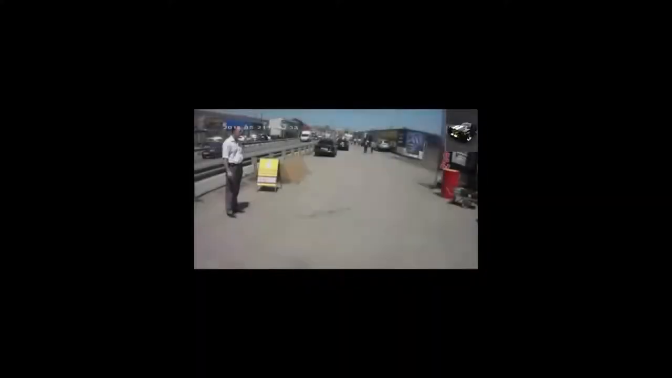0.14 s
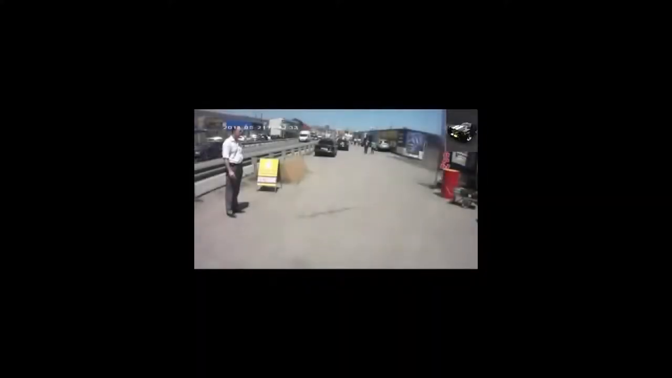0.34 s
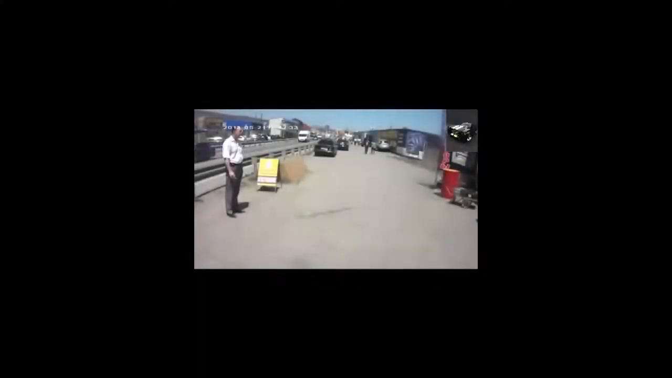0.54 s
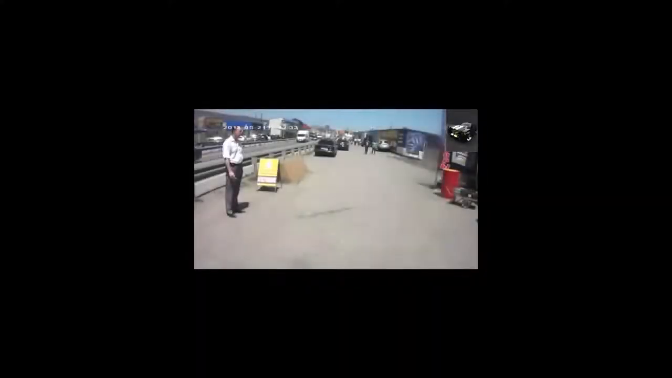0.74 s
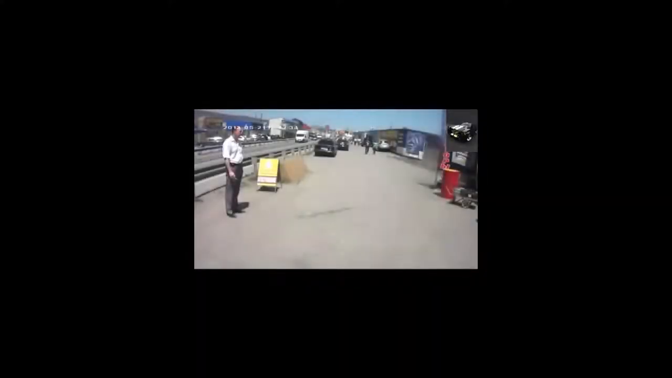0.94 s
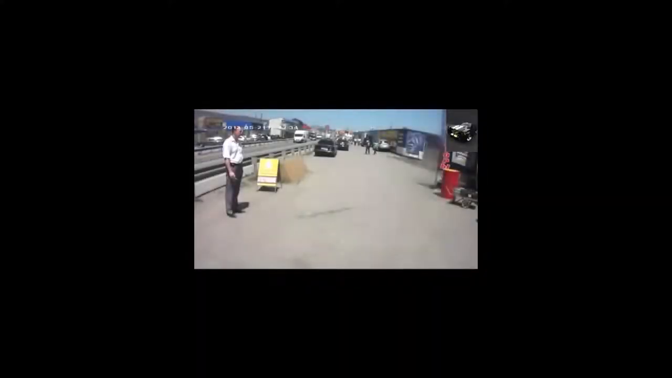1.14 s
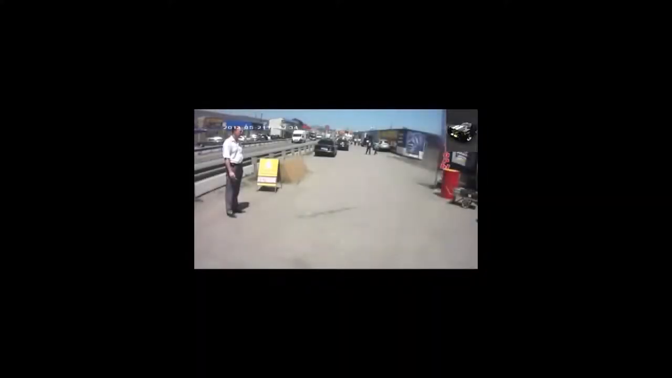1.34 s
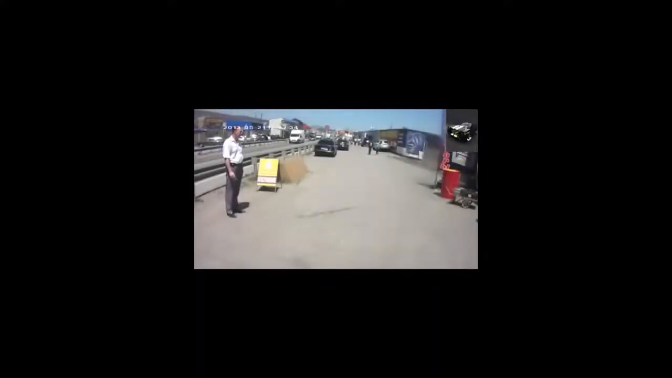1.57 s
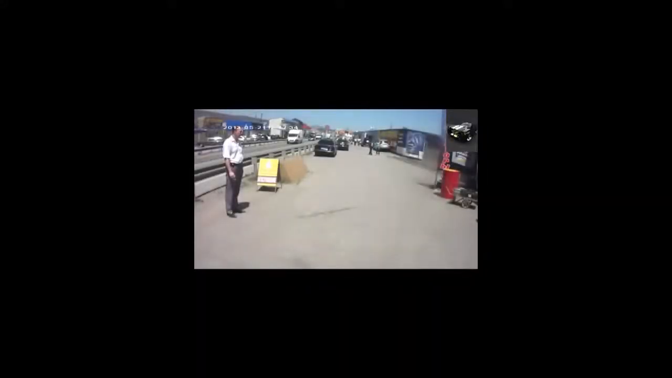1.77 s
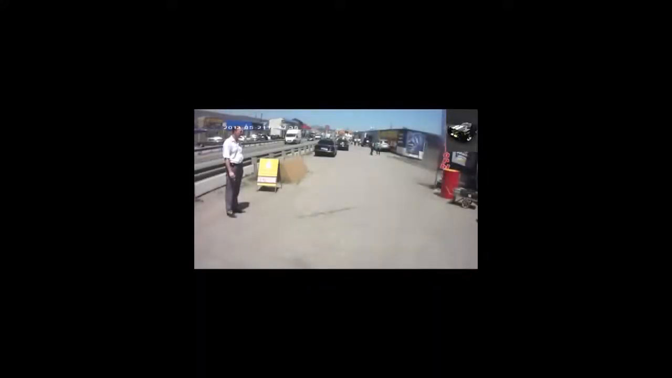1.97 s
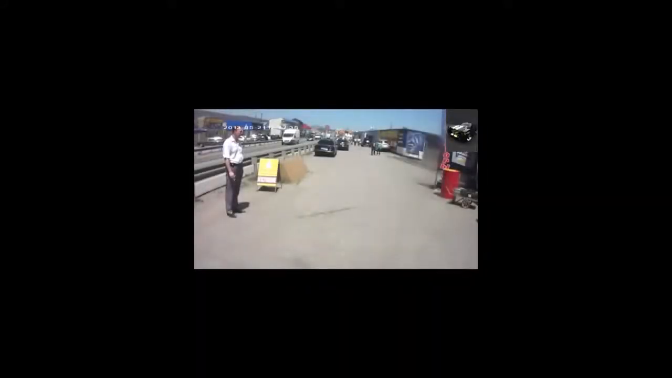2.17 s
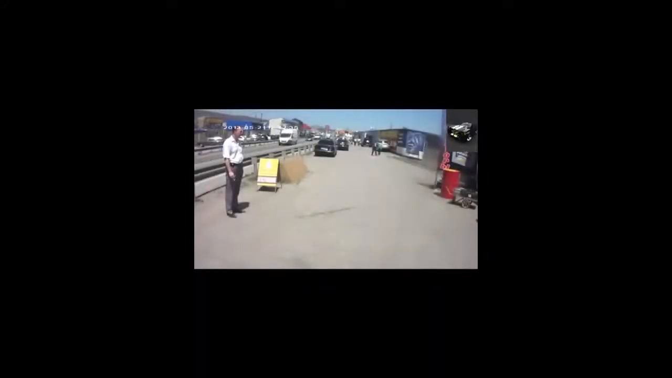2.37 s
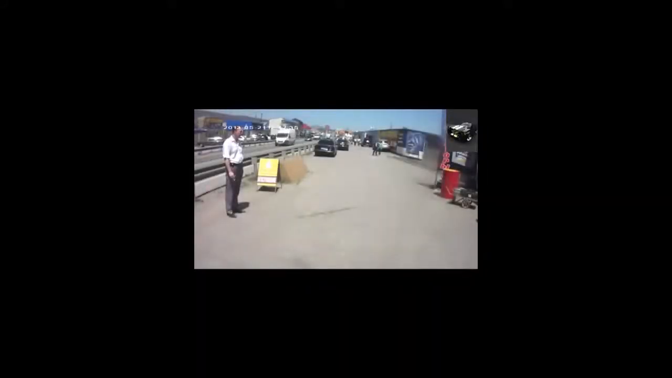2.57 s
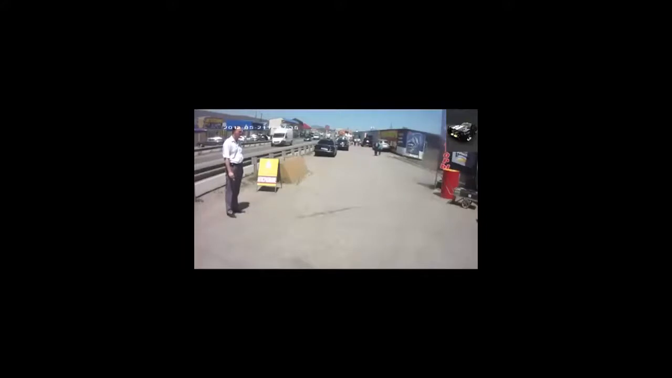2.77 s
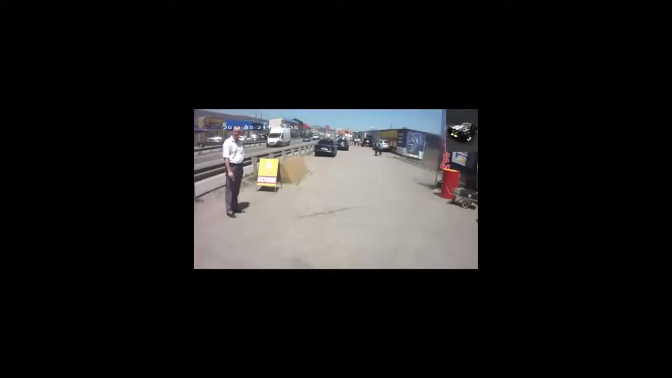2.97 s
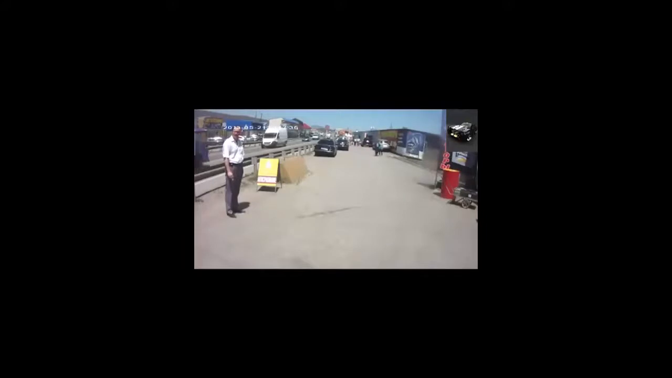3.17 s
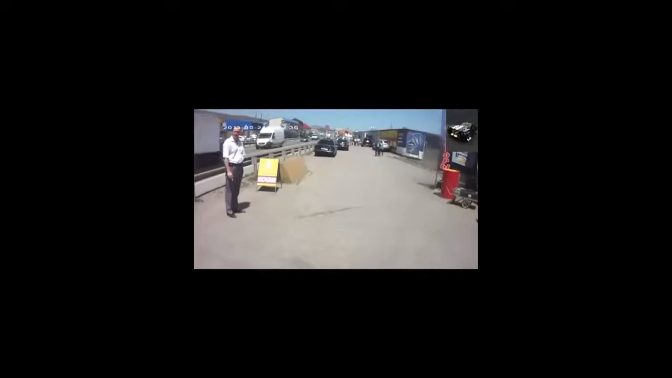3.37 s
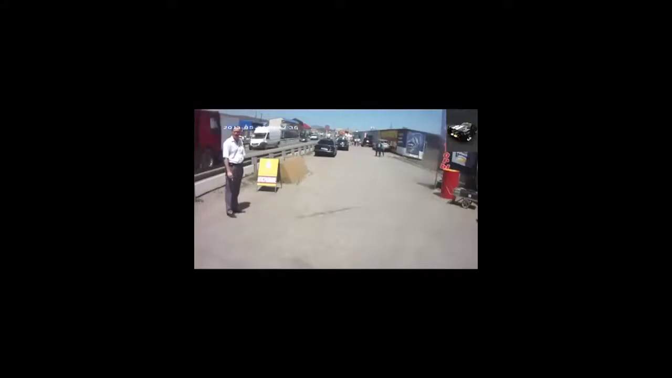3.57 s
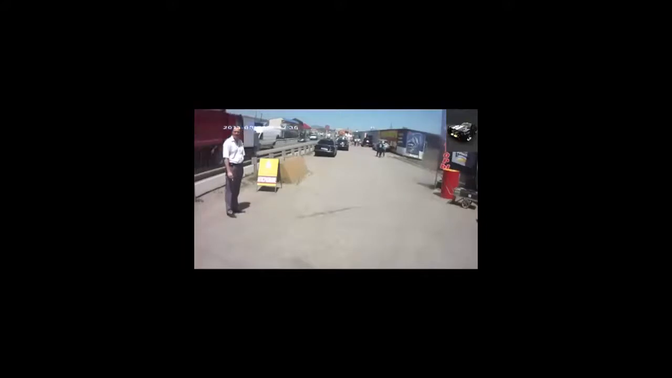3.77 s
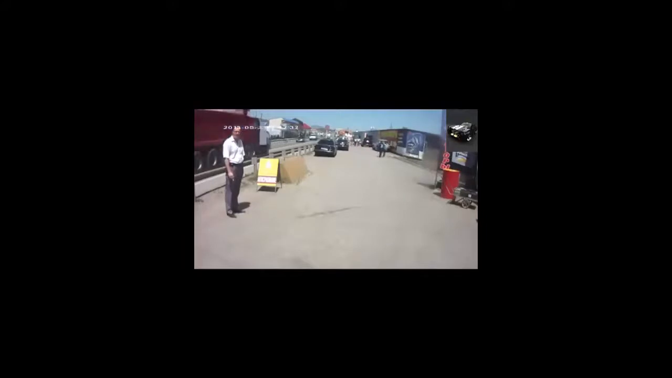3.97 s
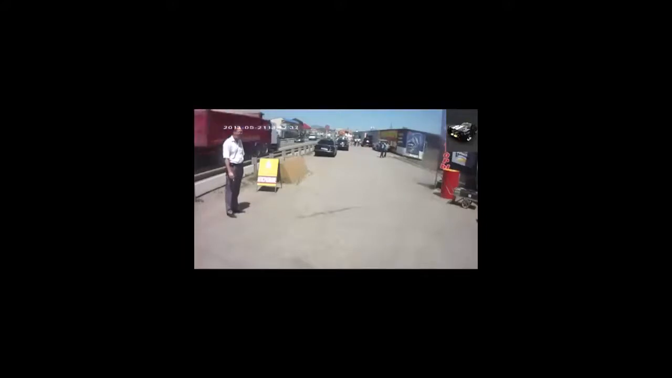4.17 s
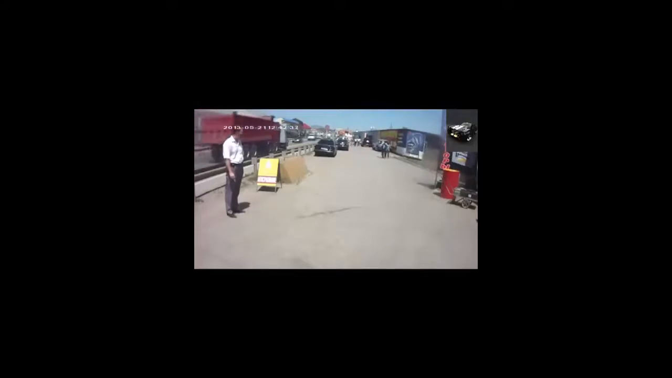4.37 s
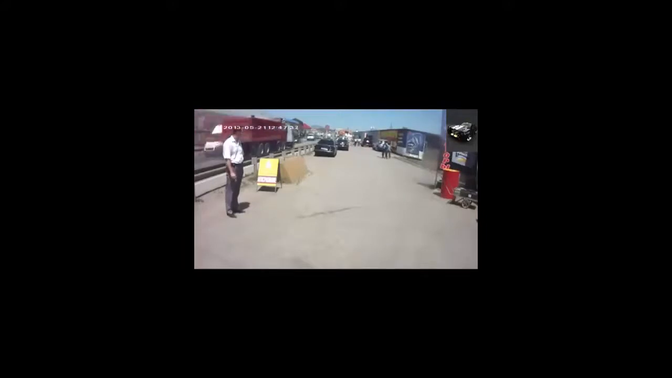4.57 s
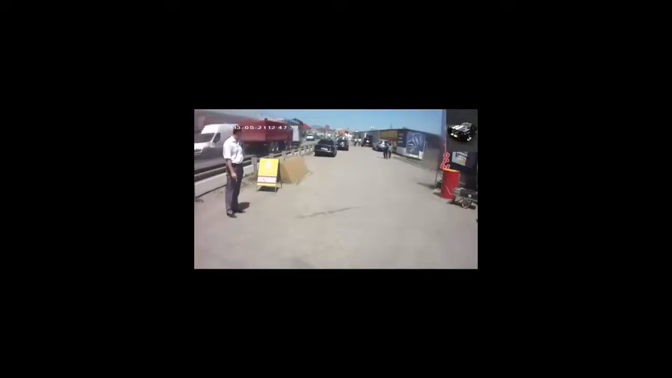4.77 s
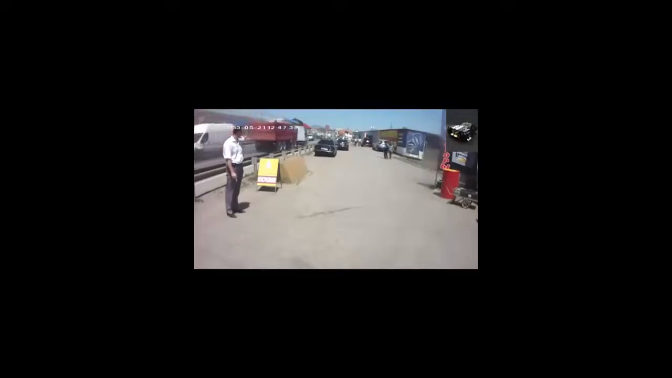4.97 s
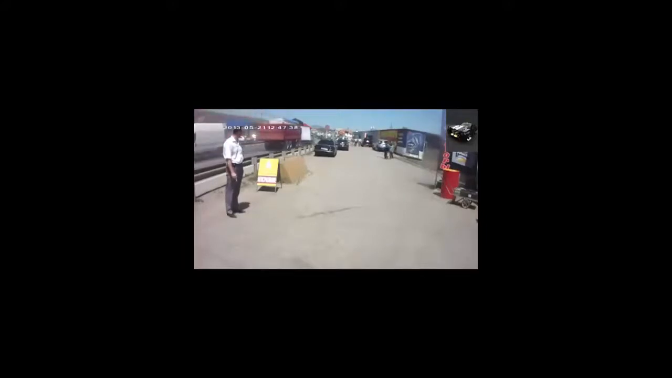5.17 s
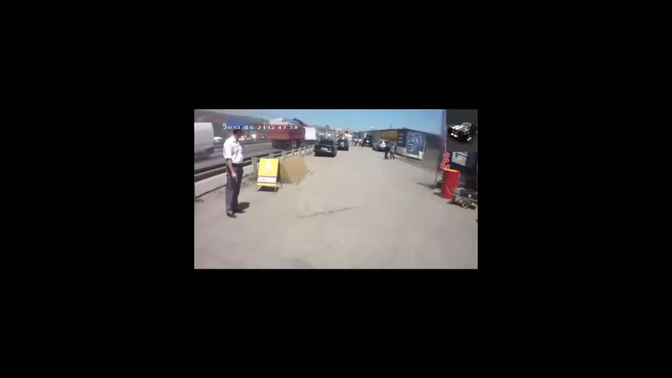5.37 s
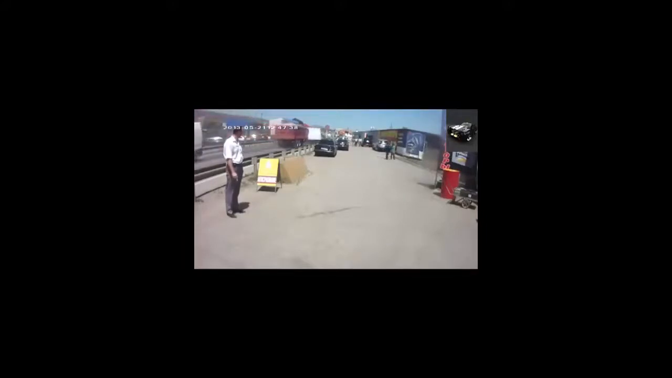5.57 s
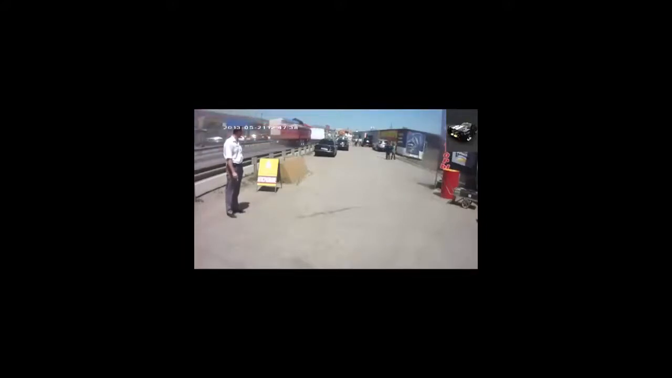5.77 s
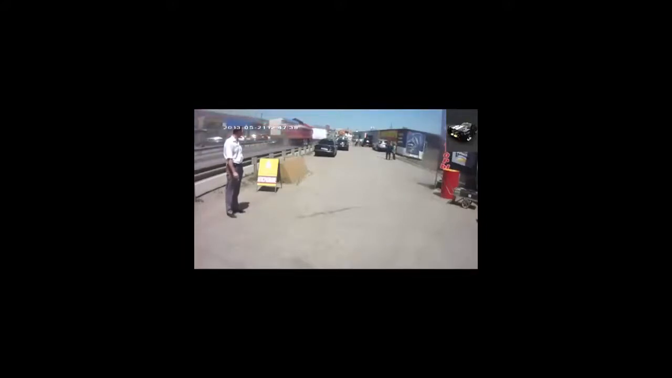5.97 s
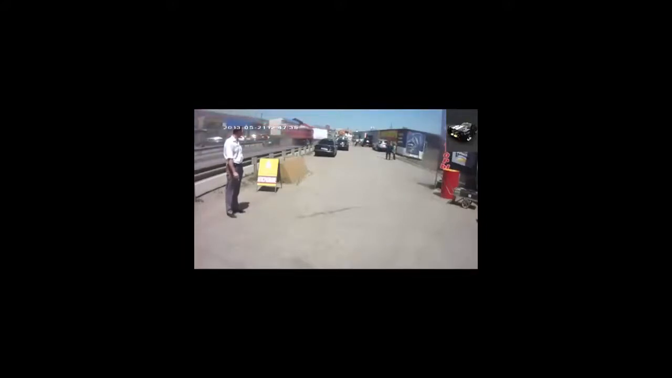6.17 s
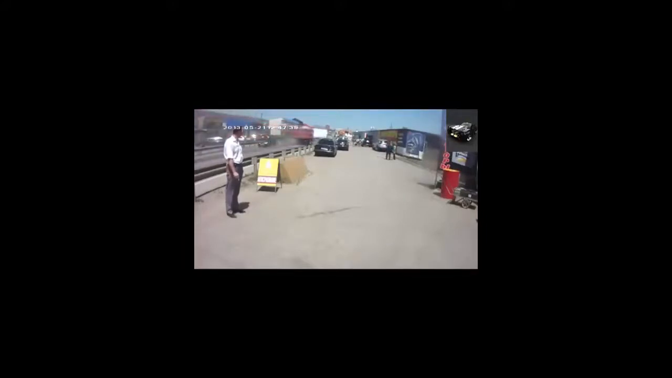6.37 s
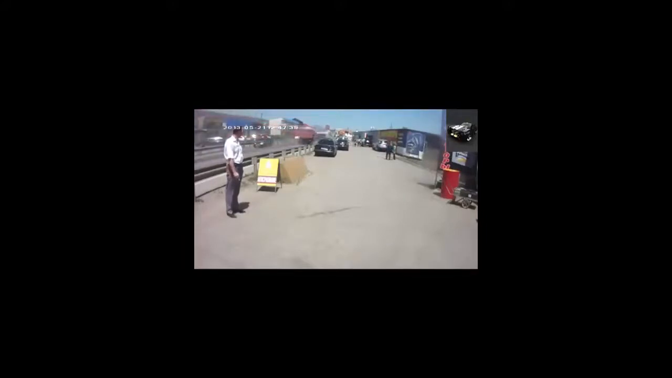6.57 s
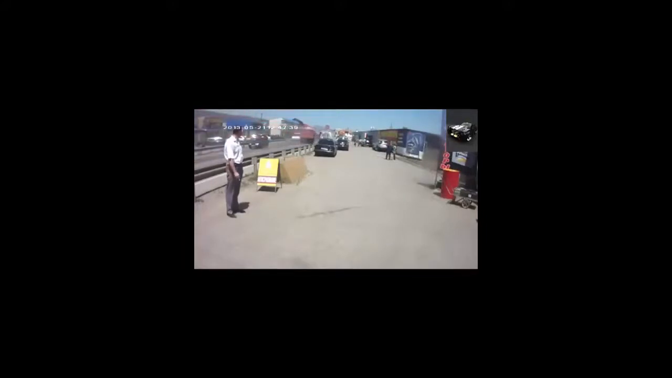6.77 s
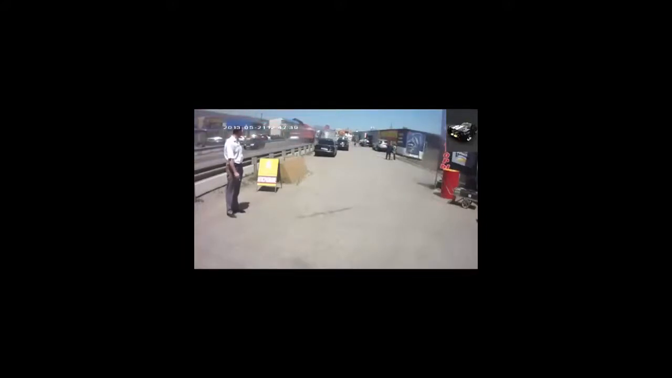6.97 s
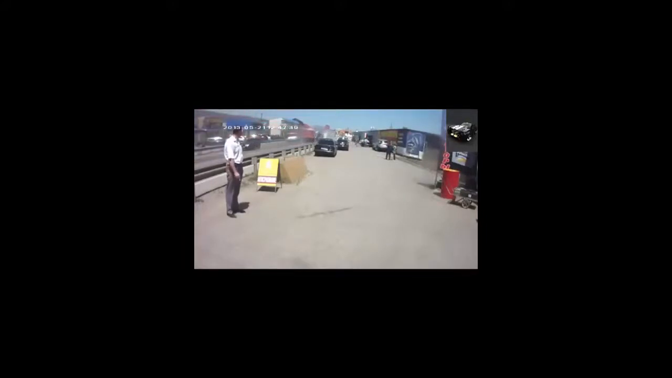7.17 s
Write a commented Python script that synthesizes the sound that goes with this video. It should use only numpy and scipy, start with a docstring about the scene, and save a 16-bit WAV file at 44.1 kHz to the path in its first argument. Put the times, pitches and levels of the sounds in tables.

```python
"""A heavy truck's drone comes up a busy road, sinks in pitch as it passes a fixed microphone and draws away.
The drone is a wavering tone with side tones; tyre and road roar is shaped noise, from the truck and a vehicle behind.
The empty steel body thumps over a joint and later knocks again: ringing modes, rattles and low pushes of air.
Air valves hiss in sputtering jets of filtered noise, with a squeak; low noise rumbles underneath."""
import sys
import numpy as np
from scipy import signal
from scipy.fft import rfft, irfft, next_fast_len
from scipy.io import wavfile
from scipy.ndimage import uniform_filter1d

SR = 44100
rng = np.random.default_rng(int(sys.argv[2]) if len(sys.argv) > 2 else 0)


def amplitude_ratio(level_db):
    """Convert a level in decibels to the matching linear amplitude (field) ratio."""
    exponent = np.asarray(level_db, float) / 20
    return 10 ** exponent


def digitize_waveform(pressure):
    """Quantize a signal to 16-bit integers and store it at the path in sys.argv[1].

    Rows of a 2-D input are taken as channels; values are limited to [-1, 1].
    """
    field = np.atleast_2d(pressure).T
    bounded = np.clip(field, -1, 1)
    quanta = np.round(bounded * 32767).astype(np.int16)
    wavfile.write(sys.argv[1], SR, quanta)


N = 318402
T = np.arange(N) / SR  # s


def read(points, hz):
    """Interpolates (hz, value) points over log frequency."""
    f, value = np.transpose(points)
    return np.interp(np.log(hz + 1), np.log(f + 1), value)


def curve(rows):
    """Interpolates (s, value) rows over the whole scene."""
    s, value = np.transpose(rows)
    return np.interp(T, s, value)


def bumps(rows, after=0.97):
    """Sum of rounded swells or dips in dB; the second half lasts the share after of the first."""
    total = 0
    for s, db, half_s in rows:
        width_s = half_s * np.where(T > s, after, 1)
        total = total + db * np.exp(-((T - s) / width_s) ** 2)
    return total


def evened(x):
    """Scales to unit rms."""
    return x / np.sqrt(np.mean(x ** 2) + 1e-20)


def wobble(hz):
    """Slow chance of unit rms, up to about hz: noise through a one-pole lowpass."""
    return evened(signal.lfilter([1], [1, -np.exp(-2 * np.pi * hz / SR)], rng.standard_normal(N)))


def slow(hz, samples):
    """A wobble smoothed over a number of samples, at unit rms."""
    return evened(uniform_filter1d(wobble(hz), samples))


def sine(hz):
    """Sine that follows the pitch curve hz."""
    return np.sin(2 * np.pi * np.cumsum(hz) / SR)


def blurred(hz, width_hz):
    """A narrow band of noise that follows the pitch curve hz: two wobbles on quadrature carriers."""
    turn = 2 * np.pi * np.cumsum(hz) / SR
    smooth = max(round(SR / width_hz / 4), 1)
    a, b = (uniform_filter1d(wobble(width_hz / 2), smooth)[:len(hz)] for _ in "ab")
    return evened(a * np.cos(turn) + b * np.sin(turn))


def shaped(field_db, size):
    """Noise from random short-time spectra; field_db(hz, s) gives the relative level per Hz."""
    hz = np.fft.rfftfreq(size, 1 / SR)[:, None]
    s = np.arange(4 * N // size + 5) * size / 4 / SR
    a, b = rng.standard_normal((len(s), len(hz), 2)).T
    spectra = (a + 1j * b) * amplitude_ratio(field_db(hz, s))
    return signal.istft(spectra, nperseg=size, noverlap=3 * size // 4)[1][:N]


def burst(s, rise_s, t60_s, held_s=0.):
    """A 0.8 s slice from s, the time in it, and an envelope that rises, holds and dies away."""
    part = slice(round(s * SR), round((s + .8) * SR))
    u = np.maximum(T[part] - s, 0)
    rise = 1 - np.exp(-u / max(rise_s, .001))
    return part, u, rise * amplitude_ratio(-60 * np.maximum(u - held_s, 0) / t60_s)


def flat_top(s, half_s):
    """A swell around s with a flat top, down to 1/e at half_s to either side."""
    return np.exp(-((T - s) / half_s) ** 4)


def drone():
    """The drive line's tone with a rough skirt, its blurred octave and the engine's firing tone, all sinking."""
    # higher while the truck comes, lower once it goes: time_s, pitch_hz
    pitch = [(.8, 234.1), (1.6, 235), (2.1, 231), (2.6, 228.7), (3.0, 227), (3.4, 221.9), (3.6, 215.8),
             (3.9, 212), (4.15, 209.2), (4.4, 203.1), (4.75, 204.9), (5.3, 202.5), (5.9, 201), (6.5, 199)]
    # shut off by a passing body just after the thump: time_s, level_db
    tone_level = [(0.3, -52), (.84, -28), (1.5, -30), (1.74, -20.5), (2.2, -27.5), (2.8, -19), (3.37, -16),
                  (4.19, -13), (4.37, -18.5), (4.46, -38.5), (5.02, -20), (5.3, -29), (5.45, -31),
                  (5.86, -29.5), (6.1, -47), (6.39, -27), (6.6, -47)]
    # brief breaks in the drone: centre_s, depth_db, half_length_s
    breaks = [(.77, -28.5, 0.08), (1.09, -13, 0.24), (1.44, -6, 0.029), (1.65, -29, 0.045),
              (1.83, -11, 0.097), (2.25, -10.5, 0.039), (2.63, -19, 0.036), (2.74, -11.5, 0.031),
              (3.46, -22.5, 0.041), (3.565, -14.5, 0.052), (3.79, -5.5, 0.076), (3.96, -3, 0.035),
              (4.08, -4, 0.018), (4.29, -3.5, 0.078), (4.96, -14.5, 0.069), (5.14, -11, 0.055),
              (5.35, -29, 0.027), (5.72, -9.5, 0.092), (5.94, -14, 0.068)]
    # swells of the firing tone: centre_s, rise_db, half_length_s
    swells = [(3.3, 3.1, 0.42), (4.36, 5.6, 0.16), (5.4, 5.3, 0.56), (5.95, 8.8, 0.055), (6.3, 8.5, 0.26),
              (6.85, 4.3, 0.2), (7.22, 9.6, 0.064)]
    hz = uniform_filter1d(curve(pitch), 4000) + 1.3 * slow(4.65, 3000)  # 1.3 Hz rms waver

    tone_db = curve(tone_level) + bumps(breaks, 0.69)  # returns faster than it sinks
    phase_waver = 0.073 * wobble(3.9)
    tone = np.sqrt(2) * np.sin(2 * np.pi * np.cumsum(hz) / SR + phase_waver)
    tone += 0.14 * blurred(hz, 34)

    # grows until the truck shows its tail, then fades slowly
    peak_s, rise_db_per_s, fall_db_per_s = 3.63, 11, 1.45
    octave_db = -29.5 + np.minimum(rise_db_per_s * (T - peak_s), fall_db_per_s * (peak_s - T))
    octave = evened(blurred(1.96 * hz, 60) + .8 * blurred(1.98 * hz, 20))

    firing_hz, heard_s, onset_db_per_s = .697 * hz, 1.3, 27
    firing_db = -38.5 + np.minimum(onset_db_per_s * (T - heard_s), 0) + bumps(swells)
    firing = sine(firing_hz) + .7 * blurred(firing_hz, 17)

    out = amplitude_ratio(tone_db) * tone + amplitude_ratio(octave_db) * octave + amplitude_ratio(firing_db) * firing
    return out + side_tones(hz)


def side_tones(drone_hz):
    """Part line, part narrow noise: tones that sink with the drone, and a faint wavering whine that sinks."""
    # multiple_of_drone, width_hz, level_over_roar_db, loudest_s, half_length_s
    tones = [(0.138, 1.8, -10, 0.84, 1.4), (0.15, 5, -14.5, 6.2, 0.34), (.5, 25, -3, 1.24, 1.8),
             (0.596, 7.5, -3.5, 3.18, 0.47), (1.18, 4.5, 0.5, 3.86, 0.42), (2.2, 18, -4, 1.82, 1.46),
             (1.05, 17, -1.5, 1.4, 0.34), (2.27, 23.5, -2.5, 4.26, 1.28), (3.302, 2.5, -13, 0.53, 1.2),
             (0.494, 14, -6, 4.7, 1), (.5, 4.3, -6, 3.4, 0.24), (1.8, 13, -0.5, 3.8, 0.33),
             (1.8, 6.8, -5, 5.3, 0.087), (1.75, 12, -5.5, 1.69, 0.61), (2.08, 8.5, -2.5, 1.1, 0.27),
             (4.101, 58, -6.5, 4.1, 1.32), (4.1, 70, -4, 5.07, 0.09), (4.62, 10, -1, 5.15, .06),
             (3.9, 12, -3, 4.75, 0.044)]
    lines = []
    for multiple, width_hz, over_db, s, half_s in tones:
        steady = .8 * np.exp(-width_hz / 22)  # wider tones keep less of a clear line
        lines.append((steady, multiple * drone_hz, width_hz, over_db, s, half_s))
    whine_s, sag_hz_per_s, waver_hz = 1.67, 9, 3
    whine_hz = 900 - sag_hz_per_s * (T - whine_s) + waver_hz * slow(3., 3000)
    lines.append((.78, whine_hz, 14, -6, whine_s, 0.72))

    out = np.zeros(N)
    for steady, hz, width_hz, over_db, s, half_s in lines:
        side = steady * np.sqrt(2) * sine(hz) + (1 - steady) * blurred(hz, width_hz)
        out += amplitude_ratio(roar_db(T) + over_db) * flat_top(s, half_s) * side
    return out


def roar_db(s):
    """Each vehicle's power falls with the square of its distance; the level fades in at the start."""
    # truck, then the vehicle behind it: closest_s, level_db, coming_s, going_s
    passes = [(3.5, -25.5, 0.83, 0.64), (6.359, -29.5, 0.18, 0.57)]
    power = 0
    for closest_s, db, coming_s, going_s in passes:
        away = (s - closest_s) / np.where(s < closest_s, coming_s, going_s)
        power = power + amplitude_ratio(db) ** 2 / (1 + away ** 2)
    return 10 * np.log10(power) - 6.1 * np.exp(-s / 0.22)


def roar():
    """Tyre and road noise whose colour moves between far and near, with drifting patches; over it, thin bands
    of the sound flicker in level, most in the treble."""
    # spectra of the far and the near roar: freq_hz, relative_db_per_hz
    far = [(35, -23), (60, -9.5), (162, -4.5), (223, -3.5), (300, -8.5), (380, -7), (499, -6.5), (800, -12),
           (1060, -17.5), (1230, -17.5), (2230, -36.5), (3620, -43.5), (14800, -70.5)]
    near = [(35, -54.5), (60, -26.5), (169, -29), (223, -3.5), (281, -6.5), (523, -12.5), (706, -16.5),
            (868, -14.5), (2130, -30), (3710, -45.5), (14800, -69.5)]
    # mix from far (0) to near (1): time_s, share
    nearness = [(0, 0.35), (.6, 0.46), (1.45, 0.64), (1.9, 0.54), (2.6, 0.72), (2.95, 0.89), (3.6, 0.5),
                (4.4, 0.39), (5.8, .05), (6.25, 0.47), (6.55, 0.09), (7.22, 0.48)]
    # uneven surges of the second vehicle: centre_s, change_db, half_length_s
    surges = [(6.247, 3.5, 0.038), (6.302, -6, .02), (6.349, 1.5, 0.029), (6.398, -3, 0.018),
              (6.451, 4.5, .045), (6.592, 0.5, 0.065), (6.87, 0.5, 0.035)]
    share_s, near_share = np.transpose(nearness)

    def field_db(hz, s):
        share = np.clip(np.interp(s, share_s, near_share), 0, 1)
        colour = (1 - share) * read(far, hz) + share * read(near, hz)
        middle = (hz[:, 0] > 500) & (hz[:, 0] < 2500)
        colour -= 10 * np.log10((amplitude_ratio(colour[middle]) ** 2).sum(0))  # equal power in the middle band
        patches = rng.standard_normal((len(s), len(hz))).T
        patches = evened(uniform_filter1d(uniform_filter1d(patches, 8, 0), 6, 1))
        # flicker in thin bands, most in the treble
        streaks = evened(uniform_filter1d(rng.standard_normal((len(s), len(hz))), 10, 0).T)
        streak_db = 2.79 + 1.1 * np.clip(hz / 5000, 0, 1)
        return colour + roar_db(s) + streak_db * streaks + 0.79 * patches + 32

    return shaped(field_db, size=2048) / np.sqrt(2048) * amplitude_ratio(bumps(surges, 0.54))


def knocks():
    """Each blow rings the steel body, clear in low modes and a rattle above, and pushes a low pulse of air."""
    # start_s, level_db, brightness_db_per_octave, low_push_db, panel_boom_db
    blows = [(4.065, -24, 2.5, -35, -32), (4.09, -18, -0.5, -17, -18.5), (4.104, -11, -4, -23, -22),
             (4.156, -19.5, -0.5, -29, -40), (4.225, -35.5, 0.5, -42, -16), (4.345, -21.5, -4.5, -38, -20),
             (6.075, -41, 2.5, -40, -21.5), (6.105, -28, 1, -40, -16), (6.15, -36, 1, -40, -21),
             (6.186, -21, -0.5, -29, -14), (6.221, -31, 4, -40, -15), (6.247, -25, -3, -32, -13.5),
             (6.332, -38.5, 4.5, -39, -26), (6.363, -29, 0.5, -30, -24), (6.43, -34.5, 3, -23, -40),
             (6.471, -32.5, -9, -37, -18.5), (6.683, -19.5, -0.5, -31, -16.5),
             (6.715, -33.5, 2.5, -34.5, -24.5), (6.877, -38.5, 4, -15, -46), (7.029, -41, -14, -40, -22.5),
             (7.196, -26.5, 2.5, -21, -19)]
    # modes of the body: freq_hz, width_hz, level_db
    body = [(101.5, 4.2, -8), (204.3, 180, -4.5), (279.3, 43, -2.5), (495.5, 30, -7.5), (617.3, 410, -6.5),
            (813.5, 420, -10.5), (1150, 57, -23.5), (1307, 90, -21), (1570, 160, -20), (2122, 170, -31),
            (2203, 1900, -25.5)]
    # modes of the main panel: freq_hz, highest_level_db
    panel_modes = [(315, -12.5), (358, -8.5), (392, -1.5), (430, -8)]
    rattles = [blurred(np.full(N, hz), width_hz) for hz, width_hz, _ in body]
    chances = rng.random((len(blows), len(body)))
    out = np.zeros(N)
    for (s, db, bright_db, push_db, boom_db), chance in zip(blows, chances):
        t60_s = max(0.16 + 0.25 * bright_db, .06)  # brighter blows rattle longer
        part, u, envelope = burst(s, .003, t60_s)
        for (hz, _, mode_db), rattle, turn in zip(body, rattles, chance):
            clear = np.clip(1.3 - hz / 600, 0, .9)
            mode_hz = hz * (1 + .04 * (2 * turn - 1))  # detuned by chance
            ring = clear * np.sqrt(2) * np.sin(2 * np.pi * mode_hz * u)
            ring += np.sqrt(1 - clear ** 2) * rattle[part]
            out[part] += amplitude_ratio(db + mode_db + bright_db * np.log2(hz / 400)) * envelope * ring

        panel = 0
        for (hz, mode_db), turn in zip(panel_modes, chance):
            mode_hz = hz * (1 + 0.07 * (turn - .5))
            panel = panel + amplitude_ratio(mode_db + 4 * (turn - 1.0)) * np.sin(2 * np.pi * mode_hz * u)
        boom_envelope = burst(s, 0.0056, .17, 0.026)[2]
        out[part] += amplitude_ratio(boom_db) * boom_envelope * panel
        out[part] -= amplitude_ratio(push_db) * burst(s, .01, 0.12)[2] * np.sin(2 * np.pi * 33 * u)
    return out + singing()


def singing():
    """A loose part of the body sings on after the later blows: narrow bands of noise."""
    # centre_s, level_db, freq_hz, half_length_s
    notes = [(6.21, -42.5, 1596, 0.032), (6.24, -44, 1296, 0.039), (6.354, -42, 1363, 0.034),
             (6.445, -36, 1580, .035), (6.47, -40, 1186, 0.049), (6.8, -49, 1150, 0.27),
             (6.89, -39, 1564, 0.031)]
    out = np.zeros(N)
    for s, db, hz, half_s in notes:
        out += amplitude_ratio(db) * flat_top(s, half_s) * blurred(np.full(N, hz), 120)
    return out


def puffs():
    """Compressed air in sputtering jets: a hump of noise, a flat fizz above and a duller rush an octave below."""
    # start_s, level_db, rise_s, centre_hz, fizz_over_hump_db
    valves = [(4.07, -52, 0.025, 3590, -14.5), (4.15, -58, .015, 4480, -10),
              (4.578, -46.5, 0.03, 5060, -9.5), (4.68, -57.5, .02, 5800, -7), (4.77, -66, 0.018, 5800, -5),
              (6.015, -45.5, 0.024, 4440, -18), (6.1, -49.5, .02, 4200, -14),
              (6.225, -49, 0.024, 3880, -22), (6.312, -55.5, 0.0043, 5450, -4),
              (6.419, -64.5, .03, 4450, -10.5), (6.53, -58.5, .04, 4400, -17.5),
              (6.685, -51.5, .02, 4840, -18), (6.75, -54.5, .03, 5000, -15.5),
              (6.85, -52.5, 0.04, 4430, -22), (6.95, -57.5, .03, 4400, -20.5),
              (7.195, -50, 0.038, 5000, -4)]
    # thin spits in the high treble: start_s, level_db
    spits = [(6.184, -60), (6.385, -57)]
    # start_s, level_db, rise_s, held_s, t60_s, centre_hz, width_octaves, fizz_over_hump_db
    jets = [(s, db, rise_s, 0.048, .6, hz, 0.6, fizz_db) for s, db, rise_s, hz, fizz_db in valves]
    jets += [(s, db, .005, .018, .22, 12600, .25, -10) for s, db in spits]

    hz = np.fft.rfftfreq(SR, 1 / SR) + 1
    out = np.zeros(N)
    for s, db, rise_s, held_s, t60_s, centre_hz, width, fizz_db in jets:
        octaves = np.log2(hz / centre_hz)
        hump = np.exp(-(octaves / width) ** 2)
        fizz = amplitude_ratio(fizz_db) / (1 + np.exp(-6 * octaves))
        rush = amplitude_ratio(2.5) * np.exp(-((octaves + 1) / .8) ** 2)
        part, u, envelope = burst(s, rise_s, t60_s, held_s)
        noise = evened(irfft(rfft(rng.standard_normal(SR)) * (hump + fizz + rush), SR))
        out[part] += amplitude_ratio(db) * envelope * noise[:len(u)]
    part, squeal = squeak()
    out[part] += squeal

    fast_db = 1.1 * evened(uniform_filter1d(rng.standard_normal(N), 300))
    gusts_db = 1.1 * slow(14.0, 1500)
    return amplitude_ratio(fast_db + gusts_db) * out


def squeak():
    """A narrow band of noise whose pitch arches up and back; returns its slice and samples."""
    part, u, envelope = burst(6.31, .003, .35, .02)
    arch_hz, arch_s = 276, 0.14
    hz = 6860 + arch_hz * np.sin(np.pi * np.clip(u / arch_s, 0, 1))
    return part, amplitude_ratio(-48.5) * envelope * blurred(hz, 200)


def rumble():
    """Lumpy low noise, mostly under 80 Hz, from the ground and the air pushed by traffic."""
    # time_s, level_db
    ground = [(0, -41), (1.4, -37.5), (2.2, -39.5), (3.2, -37), (4.04, -35), (4.11, -26.5), (4.3, -31.5),
              (4.8, -36.5), (5.7, -37.5), (6.2, -29.5), (6.9, -28), (7.22, -27.5)]
    # spectrum: freq_hz, relative_db_per_hz
    spectrum = [(12, -5.5), (22, 1.5), (31, 1.5), (40, -4), (60, -6.5), (80, -3), (120, -32.5)]
    lumps_db = 1 * slow(8.6, 2000)
    noise = evened(shaped(lambda hz, s: read(spectrum, hz) + 0 * s - 60 * (hz > 150), size=4096))
    return amplitude_ratio(curve(ground) + lumps_db) * noise


def scene():
    """All sources reach one microphone, alike in both channels."""
    return np.tile(drone() + roar() + rumble() + knocks() + puffs(), (2, 1))


def top_cut(x):
    """Nothing passes above the cut-off."""
    return signal.sosfilt(signal.butter(12, 14910, fs=SR, output="sos"), x)


def record(dry):
    """The microphone housing's colour, hiss, a trace of difference between the channels and a short fade-in."""
    # resonances and notches of the housing: freq_hz, width_hz, gain_db
    housing = [(966, 132, -4), (1310, 69, 2), (1440, 245, -3), (2223, 293, 6), (2400, 21, 1.5),
               (2900, 47, -1.5), (3220, 150, 3), (3670, 260, -4), (4330, 160, 2.5), (4740, 120, -1.5),
               (5800, 100, -1), (6200, 240, 4), (6740, 98, 5.5), (7850, 240, 4), (9500, 250, 1.5)]
    size = next_fast_len(N)
    hz = np.fft.rfftfreq(size, 1 / SR)
    housing_db = -60 * (hz > 15000)  # upper edge
    for centre_hz, width_hz, db in housing:
        housing_db = housing_db + db * np.exp(-((hz - centre_hz) / width_hz) ** 2)
    hissy = dry + amplitude_ratio(-67.5) * rng.standard_normal(N)
    coloured = irfft(rfft(hissy, size) * amplitude_ratio(housing_db), size)[:, :N]

    treble = evened(shaped(lambda hz, s: -((hz - 10500) / 900) ** 2 + 0 * s, size=256))
    side = amplitude_ratio(-28) * rumble() + amplitude_ratio(-88) * treble
    mix = coloured + np.array([side, -side])
    mix *= 1 - 0.25 * np.exp(-T / 0.062)
    return top_cut(mix)


dry = scene()
out = record(dry)
digitize_waveform(out)
```